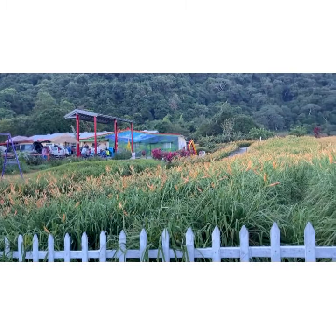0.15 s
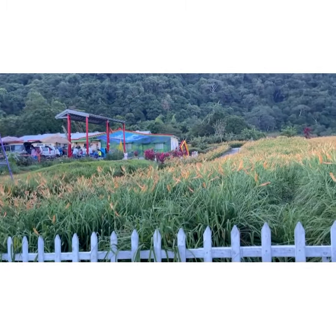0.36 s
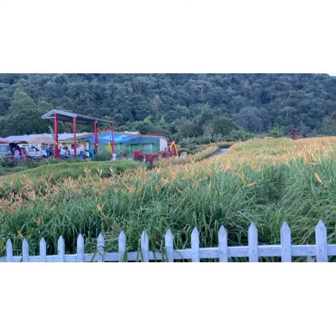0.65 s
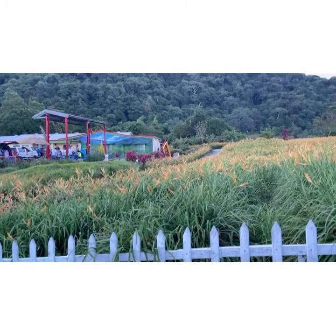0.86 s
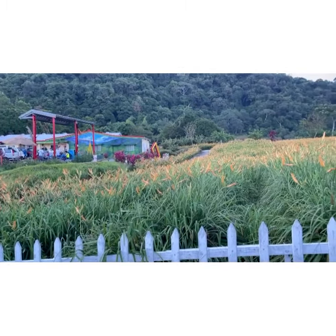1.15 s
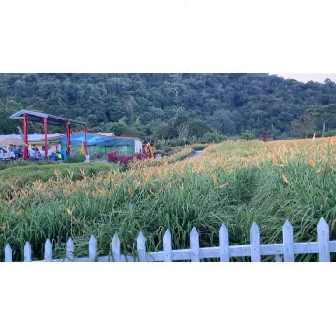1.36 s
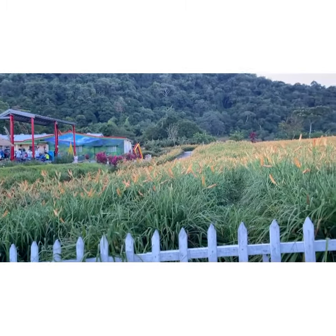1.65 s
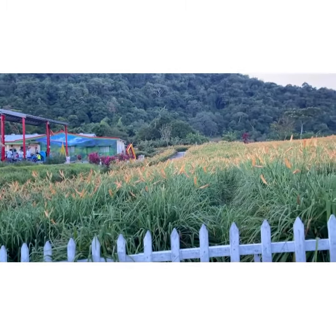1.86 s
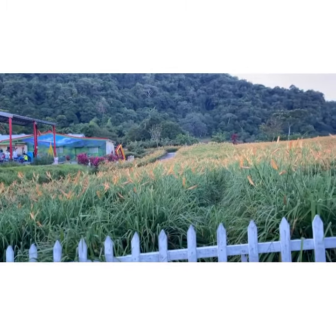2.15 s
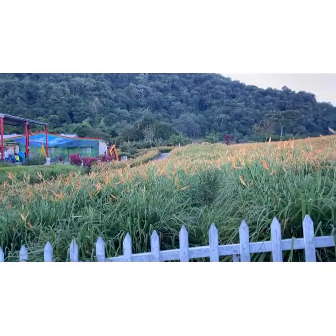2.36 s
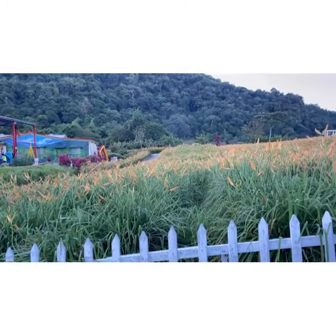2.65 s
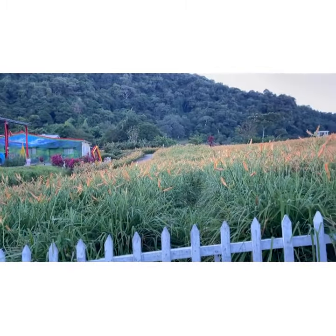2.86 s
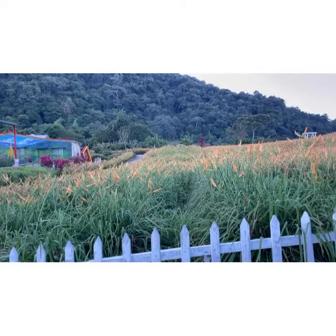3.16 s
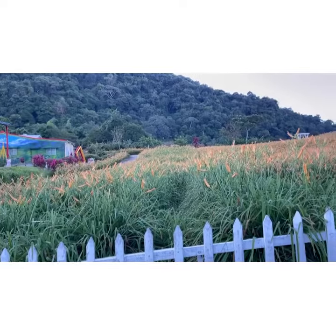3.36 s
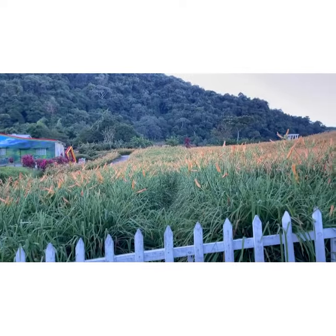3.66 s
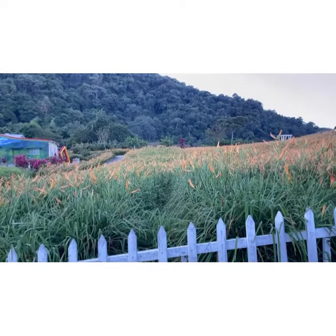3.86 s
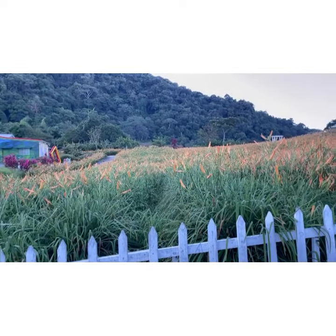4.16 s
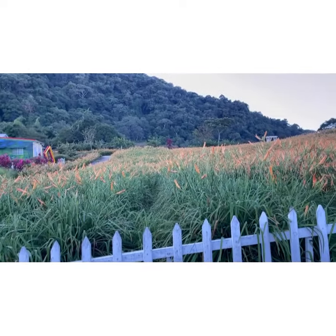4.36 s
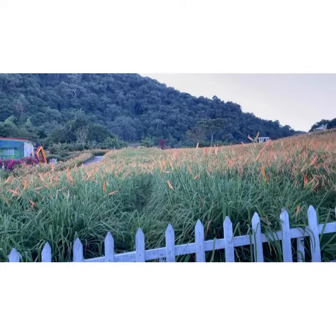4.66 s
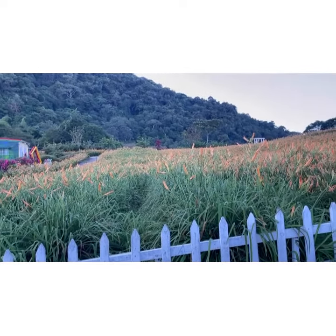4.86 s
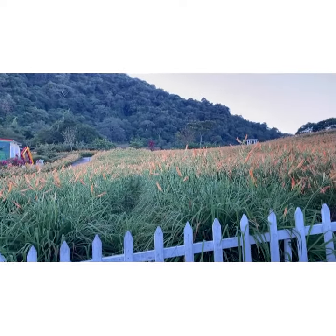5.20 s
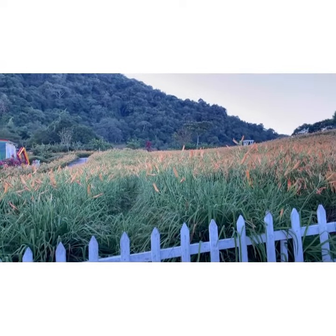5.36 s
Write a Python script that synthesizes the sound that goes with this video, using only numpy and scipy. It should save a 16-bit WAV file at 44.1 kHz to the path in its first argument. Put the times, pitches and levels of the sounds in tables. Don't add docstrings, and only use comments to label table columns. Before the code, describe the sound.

Open-air microphone among grass: bright, tiny bird whistles lead in two rapid runs, with three rough, rising squawks slapping back from the hill. Between them come brief high cricket bouts about once a second, light grass scuffs, small clicks and one crisp stem crack. Behind lie thin leaf rustle, a wavering insect chorus and a low valley motor, the far air and leaves dimming as the microphone swings away.

```python
import sys
import numpy as np
from scipy import signal
from scipy.fft import rfft, irfft
from scipy.io import wavfile
from scipy.ndimage import uniform_filter1d

SR = 44100
rng = np.random.default_rng(int(sys.argv[2]) if len(sys.argv) > 2 else 0)


def gain_from_db(level_db):
    decades = np.asarray(level_db, float) / 20
    return 10 ** decades


def file_out(sig):
    cols = np.atleast_2d(sig).T
    lim = np.clip(cols, -1, 1)
    pcm = np.round(lim * 32767).astype(np.int16)
    wavfile.write(sys.argv[1], SR, pcm)


N = 243873


def evened(x):
    return x / np.sqrt(np.mean(x ** 2) + 1e-20)


def add(mix, s, sound):
    at = round(s * SR)
    part = mix[max(at, 0):][:len(sound) + min(at, 0)]
    part += sound[max(-at, 0):][:len(part)]


def colour(x, points):
    f, db = np.transpose(points)
    hz = np.fft.rfftfreq(len(x), 1 / SR) + 1
    gain = gain_from_db(np.interp(np.log(hz), np.log(f), db, -90, -90))
    return irfft(rfft(x) * gain, len(x))


def resonate(x, modes):
    hz = np.fft.rfftfreq(len(x), 1 / SR)
    shape = sum(gain_from_db(db) / (1 + 1j * (hz - f) / width) ** 2 for f, width, db in modes)
    return irfft(rfft(x) * shape, len(x))


def drift(seconds):
    size = max(int(seconds * SR), 2)
    return evened(uniform_filter1d(uniform_filter1d(rng.standard_normal(N), size), size))


def scatter(x, t60, db):
    t = np.arange(SR // 2) / SR
    tail = rng.standard_normal(len(t)) * gain_from_db(-60 * t / t60) * (t > .003)
    return gain_from_db(db) * signal.fftconvolve(x, tail / np.linalg.norm(tail))[:N]


def blip(s, db, hz, width_hz):
    t = np.arange(-400, 800) / SR
    glide = 1 - 60 * t * (hz > 3000)
    swell = np.exp(-(1.3 * width_hz * t) ** 2)
    return s - 400 / SR, gain_from_db(db) * swell * np.cos(2 * np.pi * hz * t * glide)


# f/Hz, level/dB
DULL_SLOPE = [(300, -10), (1550, -9), (1900, 1), (4800, 0), (6500, -10), (11000, -16), (12000, -40),
              (16000, -60)]
# t/s of the sweep, peak level/dB of the sweep, of the low note, of the last note,
# delay of the last note t/s
PHRASES = [(0.1414, -31, -39.5, -35.5, 0.031), (0.4093, -33, -43, -35.5, 0.03),
           (0.66, -30, -39.5, -36.5, 0.034), (0.929, -30.5, -47, -36.5, 0.032),
           (1.163, -33, -36, -35.5, 0.04), (1.4167, -30.5, -39, -33, 0.031),
           (1.6529, -30.5, -39, -33, 0.032), (1.961, -32, -39, -32.5, 0.03), (2.9152, -36, -43, -37, 0.029),
           (3.1797, -35.5, -40.5, -38, 0.03), (3.4199, -34, -41, -36.5, 0.032),
           (3.66, -31.5, -39.5, -36, 0.032), (3.9101, -30.5, -42, -36, 0.031),
           (4.1636, -31.5, -38, -38.5, 0.033), (4.409, -31, -39.5, -36.5, 0.03),
           (4.6529, -31, -39.5, -35.5, 0.031)]
# t/s from the sweep (the last note: from its own delay), f/Hz, level/dB
NOTE_SHAPES = [
    [(-.042, 4500, -24), (-.034, 4470, -6), (-.029, 4440, 0), (-.027, 4420, -2), (-.023, 4400, -30)],
    [(-.022, 4950, -26), (-.012, 5080, -13), (-.006, 5280, -1.5), (-.0025, 5650, -1.5), (0, 6450, -11),
     (.002, 7400, -24), (.005, 7680, -42), (.03, 7900, -50)],
    [(.010, 3780, -20), (.017, 3800, -8), (.022, 3870, 0), (.025, 3950, -14), (.033, 3950, -22)],
    [(-.0015, 6300, -24), (0.0, 5300, -6), (.002, 4850, -.5), (.0065, 4650, -.5), (.0095, 4620, -7),
     (.012, 4750, -26)],
]


def songbird():
    bill_lead_s, bill_db = .0615, -46
    first_db = -1.5
    out = np.zeros(N)
    wobbles = rng.standard_normal((len(PHRASES), 4))
    for (s, sweep_db, low_db, last_db, late_s), wobble in zip(PHRASES, wobbles):
        add(out, *blip(s - bill_lead_s, bill_db + 2 * wobble[0], 4340, 3600))
        peaks_db = last_db + first_db, sweep_db, low_db, last_db
        for note, db, shift_s, w in zip(NOTE_SHAPES, peaks_db, (0, 0, 0, late_s), wobble):
            at, hz, shape_db = np.transpose(note)
            t = np.arange(at[0], at[-1], 1 / SR)
            pitch = uniform_filter1d(np.interp(t, at, hz), 40)
            pitch = pitch * (1 + .007 * w + .4 * w * (t - at[2]))
            phase = 2 * np.pi * np.cumsum(pitch) / SR
            level = uniform_filter1d(gain_from_db(db + np.interp(t, at, shape_db)), 40)
            level = level * signal.windows.tukey(len(t), .15)
            whistle = np.sin(phase) + gain_from_db(-51) * np.sin(2 * phase)
            add(out, s + shift_s + at[0], level * whistle)
    return out + scatter(out, 0.15, -12.5) + scatter(colour(out, DULL_SLOPE), 0.55, -19.0)


def squawk_shape(t, flip_s, length):
    settle_s, glide_s = .013, .034
    since_head = t - flip_s - glide_s
    head = np.clip((t - flip_s) / glide_s, 0, 1)
    head = head ** 2 * (3 - 2 * head)
    chest_hz = 1355 + 2750 * t - (1355 - 992) * np.exp(-t / settle_s)
    head_hz = 2367 - 2450 * np.maximum(since_head, 0)
    head_hz = head_hz + 110 * np.cos(2 * np.pi * 36 * since_head)
    closing = np.clip(1 - (length - t) / .018, 0, 1)
    shape_db = -16.5 * np.exp(-t / 0.01) - 3 * head - 24 * closing ** 2
    chest_rough, head_rough, crack_lead_s, crack_s = 0.39, 0.89, .01, .014
    crack = np.clip((t - flip_s + crack_lead_s) / crack_s, 0, 1)
    rough = chest_rough + 0.2 * np.exp(-t / (2 * settle_s)) + (head_rough - chest_rough) * crack
    return chest_hz + head * (head_hz - chest_hz), shape_db, rough


# delay t/s, level/dB
SLOPE_SLAPS = [
    (.021, -11),
    (.067, -4),
    (.137, -18),
]


def echoed(x):
    slaps = sum(gain_from_db(db) * np.roll(x, round(s * SR)) for s, db in SLOPE_SLAPS)
    slaps = colour(slaps, DULL_SLOPE)
    smear = scatter(slaps, 0.11, -9)
    return x + 1.17 * slaps + smear + scatter(x, 0.067, -14) + scatter(x, 0.45, -4.0)


SQUAWK_CALLS = [
    (1.083, 0.093, 0.16, -38.5, -6),
    (2.712, 0.079, 0.17, -40, -3.5),
    (4.074, .084, .167, -40, 1.5),
]
# f/Hz, level/dB
OPEN_BEAK = [(900, -42), (1500, -9), (2300, -3), (3100, 7.5), (4300, 4), (5800, -2.5), (7000, -7),
             (8100, -5.5), (9300, -5.5), (10400, -4.5), (11200, -14.5), (12000, -25), (15500, -60)]


def squawks():
    out = np.zeros(N)
    order = np.arange(1, 15)[:, None]
    for start, flip_s, length, effort_db, bright_db in SQUAWK_CALLS:
        t = np.arange(0, length, 1 / SR)
        hz, shape_db, rough = squawk_shape(t, flip_s, length)
        jitter, breath = rng.standard_normal((2, len(t)))
        jitter = evened(uniform_filter1d(jitter, 80))
        turns = np.cumsum(hz * (1 + .02 * rough * jitter)) / SR
        waver = rng.standard_normal((2, 14, len(t)))
        waver = uniform_filter1d(uniform_filter1d(waver, 130), 130)
        blur = np.clip(.12 + .09 * rough * order ** 2, 0, 1)
        partial = (1 - blur + blur * evened(waver[0])) * np.cos(2 * np.pi * order * turns)
        partial += blur * evened(waver[1]) * np.sin(2 * np.pi * order * turns)
        tilt = gain_from_db(-9.0 * rough ** 2 * np.maximum(order - 2 + rough, 0))
        stack = (partial * tilt * (order * hz < 15500)).sum(0)
        rasp = colour(breath, [(300, -36), (3300, -15), (6000, 0), (20000, 0)])
        voice = gain_from_db(effort_db + shape_db) * (.5 * stack + (.4 + .6 * rough) * rasp)
        facing_us = [(300, 0), (7000, 0), (12000, bright_db), (20000, 2 * bright_db)]
        add(out, start, colour(voice, facing_us))
    return echoed(colour(out, OPEN_BEAK))


# f/Hz, width f/Hz, level/dB
STEM_MODES = [(1110, 230, -8), (2290, 290, -4.5), (3120, 2300, -0.5), (4270, 630, -5), (5550, 1150, 1),
              (8820, 1370, -1), (9970, 890, -3.5), (12800, 2300, -9.5), (14400, 500, -24)]
# f/Hz, level/dB
FIELD_ANSWER = [(300, 2), (1200, 4), (10500, -2.5), (11800, -16), (15500, -20), (16500, -60)]


def snap():
    snap_s, snap_db = 3.521, -38.5
    onset_s, tear_s, stop_s, crumble_s = .002, .0235, .0015, .01
    t = np.arange(N) / SR
    fibres = rng.standard_normal(N) * (1 + 1.5 * (rng.random(N) < 900 / SR))
    at = snap_s - onset_s + np.cumsum([0, onset_s, tear_s, stop_s, crumble_s])
    level_db = np.cumsum([snap_db - 28, 28, -4.5, -12, -7])
    live = (t > at[0]) & (t < at[-1])
    near = evened(resonate(fibres, STEM_MODES)) * gain_from_db(np.interp(t, at, level_db)) * live
    near = colour(near, [(400, -28), (1000, 3.5), (15300, 0.0), (15900, -50)])
    dull = colour(near, FIELD_ANSWER)
    slap = np.roll(dull, round(.073 * SR))
    return near + scatter(slap, 0.11, -15) + scatter(dull, 0.38, -8.0)


# last pulse t/s, length t/s, peak level/dB, pitch f/Hz
CRICKET_BOUTS = [
    (.142, .36, -56, 6150),
    (1.2, .3, -57, 6150),
    (2.256, .31, -57, 6150),
    (3.3068, .37, -55.5, 6100),
    (4.3746, .43, -56.5, 6100),
    (5.4146, .42, -56.5, 6080),
]


def cricket():
    out = np.zeros(N)
    for end, length, db, hz in CRICKET_BOUTS:
        left = np.arange(length, -.0055, -1 / SR)
        place = (.5 - 88 * left - 10.0 * left ** 2) % 1 - .5
        young = np.clip(left / length - .45, 0, 1) ** 2
        glide = (.15 - .4 * young) * place
        pitch = hz * (1 - .12 * young - glide + .002 * drift(.004)[:len(left)])
        phase = 2 * np.pi * np.cumsum(pitch) / SR
        level = gain_from_db(db - 34 * young + .9 * drift(.006)[:len(left)]) * np.exp(-(place / .23) ** 2)
        add(out, end - length, level * (np.sin(phase) + gain_from_db(-35) * np.sin(2 * phase)))
    return out + scatter(out, 0.048, -10.5)


# t/s, peak level/dB, centre f/Hz, width f/Hz
LONE_TICKS = [
    (.4195, -49, 2000, 2200),
    (1.035, -48, 370, 90),
    (2.3065, -49, 3500, 1500),
    (2.473, -70, 10800, 3000),
    (2.6385, -52, 3400, 1500),
    (3.622, -57, 1550, 200),
    (3.69, -50, 650, 120),
    (3.8893, -44, 2200, 3000),
    (4.927, -57, 6000, 6000),
    (5.3945, -42, 4000, 2600),
]


def ticks():
    out = np.zeros(N)
    for row in LONE_TICKS:
        add(out, *blip(*row))
    return out + scatter(out, .04, -11)


# t/s, turn 0-1
MIC_TURN = [
    (0, 0.18),
    (1.4, 0.06),
    (3.1, 0.67),
    (3.7, 0.66),
    (5.0, 1),
    (5.53, 1),
]


def facing(db, away_db):
    return gain_from_db(db + away_db * np.interp(np.arange(N) / SR, *np.transpose(MIC_TURN)))


# f/Hz, level/dB per Hz
LEAF_SPECTRUM = [(4500, -34), (5500, 10), (7000, -2.5), (9000, -1.5), (10500, -6), (11500, -14),
                 (13500, -12.5), (15500, -41)]
# f/Hz, level/dB per Hz
SCUFF_SPECTRUM = [(700, 0), (1300, 2.5), (2500, 2), (4000, -5.5), (6000, -30)]
# t/s, length t/s, level/dB, share of low scuff 0-1
GRASS_BRUSHES = [
    (0.413, 0.053, -55, 0.73),
    (0.724, 0.036, -61, 0.9),
    (1.017, 0.39, -57, 0.74),
    (2.325, .03, -69, 0.3),
    (2.681, 0.16, -54.5, 0.89),
    (4.378, 0.1, -60.5, 0.57),
    (4.926, 0.022, -58.5, 1),
    (5.5, .03, -61.5, 1),
]
# start t/s, end t/s, start f/Hz, end f/Hz, level/dB
FAR_WHISTLES = [
    (.68, .92, 6950, 6850, -87),
    (1.85, 2.3, 7650, 8100, -85.5),
    (2.05, 2.78, 7450, 7850, -85.5),
    (2.35, 2.75, 6450, 6350, -84),
    (2.9, 3.35, 7050, 7300, -87),
    (4.45, 4.7, 1900, 2150, -72),
]


def leaves():
    crackle = gain_from_db(3.0 * np.minimum(rng.exponential(1, N), 3))
    crackle = crackle * (rng.random(N) < 400 / SR) * rng.standard_normal(N)
    rustle = evened(colour(rng.standard_normal(N) + 0.36 * evened(crackle), LEAF_SPECTRUM))
    scuff = evened(colour(rng.standard_normal(N), SCUFF_SPECTRUM))
    gusts_db = 1.5 * drift(.3)
    out = 1.6 * facing(-80.5, -4) * rustle * gain_from_db(1.2 * drift(0.067) + gusts_db)
    for s, length, db, low in GRASS_BRUSHES:
        at, size = round(s * SR), round(length * SR)
        fade = (1 - np.exp(-np.arange(size) / 80)) * np.linspace(1, .2, size)
        grass = (1 - low) * np.roll(rustle, 999) + low * scuff
        add(out, s, gain_from_db(db) * fade * grass[at:at + size])
    for start, end, start_hz, end_hz, db in FAR_WHISTLES:
        size = round((end - start) * SR)
        phase = 2 * np.pi * np.cumsum(np.linspace(start_hz, end_hz, size)) / SR
        fuzz = drift(.0025)[:size] * np.cos(phase) + drift(.0025)[:size] * np.sin(phase)
        add(out, start, gain_from_db(db) * fuzz * signal.windows.tukey(size, .6))
    return out


# f/Hz, width f/Hz, level/dB
MOTOR_ORDERS = [(61.6, 6.1, -9), (87.1, 9.7, -4.5), (122.5, 7.6, 0.5), (155, 9.6, -6), (209, 4.5, -9.5),
                (259, 2.1, -16), (463.4, 12.3, -22.5), (704.6, 9.1, -25.5)]
# t/s, width t/s, lift level/dB
RUMBLE_SWELLS = [
    (1.15, 0.22, 1),
    (2.65, 0.12, 0.5),
    (3.75, 0.3, 2),
    (5.4, 0.12, 3.5),
]
# f/Hz, level/dB per Hz
VALLEY_AIR = [(30, -52), (60, -1), (150, -4.5), (260, -14), (350, -16.5), (480, -12.5), (700, -15),
              (1000, -19), (1600, -23), (2300, -28.5), (3200, -34.5), (5500, -39), (7000, -93),
              (9000, -120)]


def rumble():
    t = np.arange(N) / SR
    swell_db = sum(db * np.exp(-((t - s) / width) ** 2) for s, width, db in RUMBLE_SWELLS)
    motor = facing(-45 + swell_db, -1) * evened(resonate(rng.standard_normal(N), MOTOR_ORDERS))
    air = evened(colour(rng.standard_normal(N), VALLEY_AIR)) * gain_from_db(1.36 * drift(0.18))
    return 0.8 * motor + 1.994 * facing(-57, -5) * air


# f/Hz, width f/Hz, level/dB
CHORUS_BANDS = [(3954, 176, -9), (4150, 46, -2), (4272, 23, 3), (4567, 51, -1), (4620, 270, -8),
                (4840, 13.5, -4), (4890, 82, -9.5)]


def chorus():
    bands = np.zeros(N)
    for band in CHORUS_BANDS:
        insects = resonate(rng.standard_normal(N), [band])
        bands += insects * gain_from_db(2.5 * drift(0.24) + 0.6 * drift(0.0045))
    return gain_from_db(-59) * evened(bands)


def scene():
    small = ticks()
    birds = songbird() + squawks()
    insects = cricket() + chorus()
    field = leaves() + rumble() + snap()
    return (birds + insects + field + small)[None]


def low_pass(x):
    return signal.sosfilt(signal.butter(12, 15960, fs=SR, output="sos"), x)


def record(dry):
    bass_cut = signal.butter(4, 48, "highpass", fs=SR, output="sos")
    heard = signal.sosfilt(bass_cut, dry)
    heard *= signal.windows.tukey(N, 400 / N)
    return low_pass(heard)


dry = scene()
out = record(dry)
file_out(out)
```